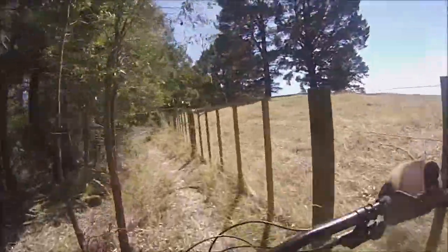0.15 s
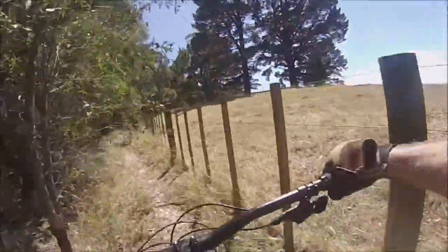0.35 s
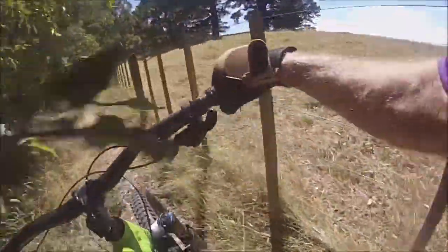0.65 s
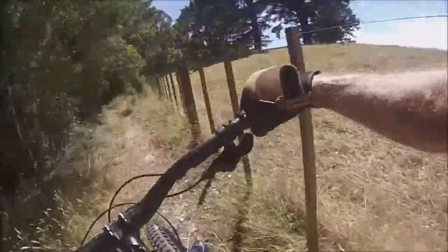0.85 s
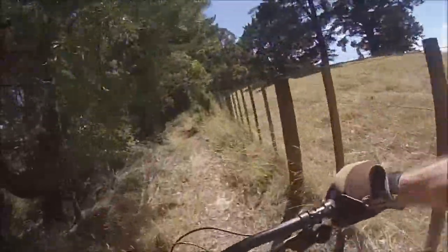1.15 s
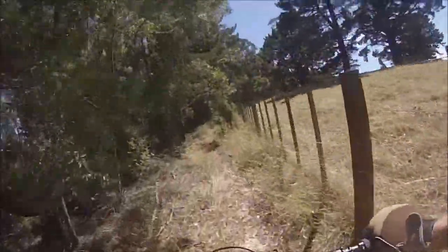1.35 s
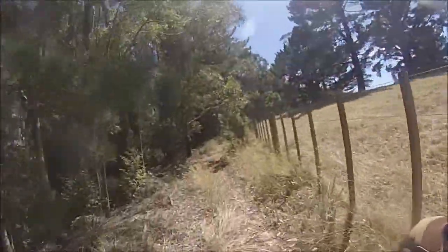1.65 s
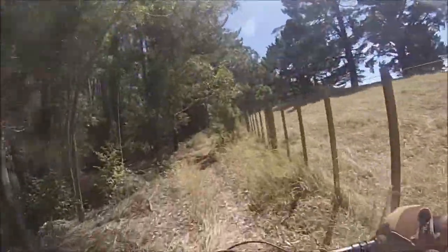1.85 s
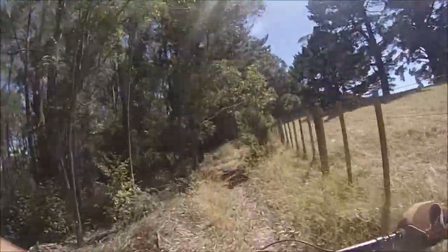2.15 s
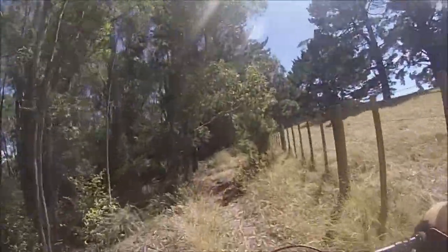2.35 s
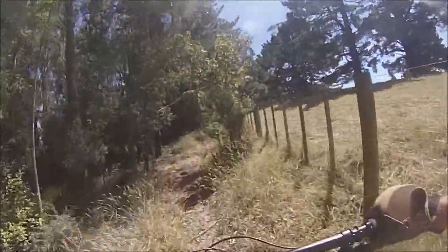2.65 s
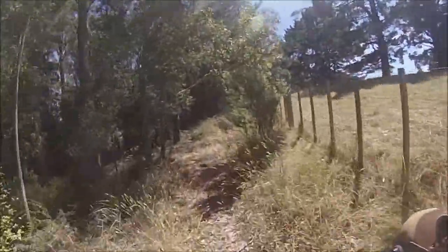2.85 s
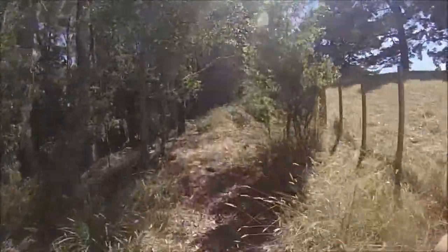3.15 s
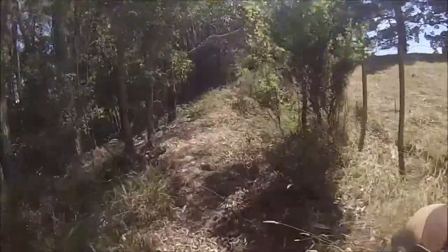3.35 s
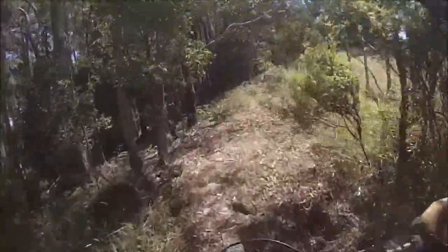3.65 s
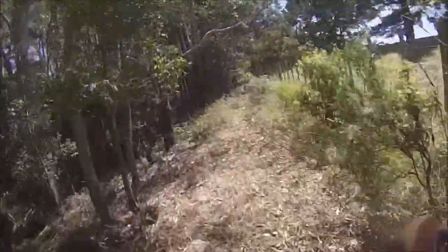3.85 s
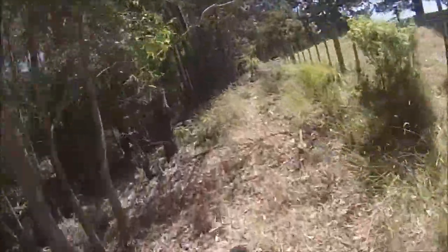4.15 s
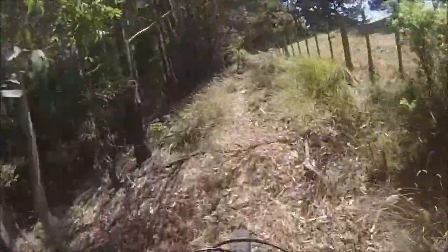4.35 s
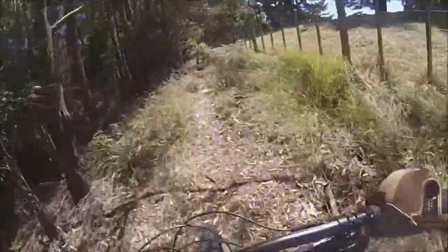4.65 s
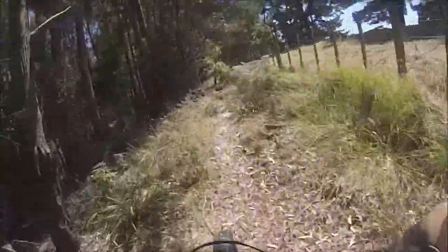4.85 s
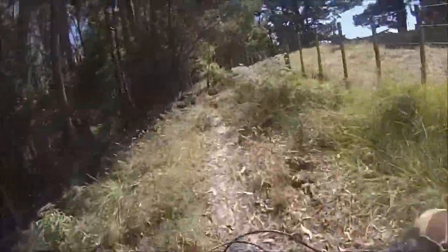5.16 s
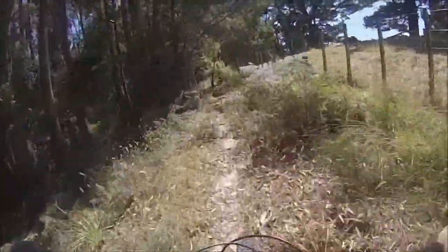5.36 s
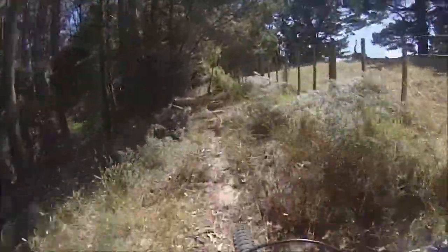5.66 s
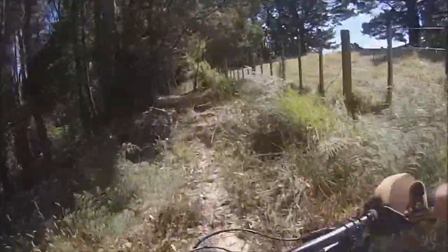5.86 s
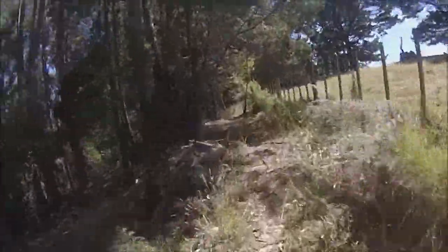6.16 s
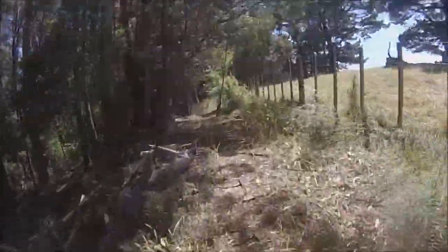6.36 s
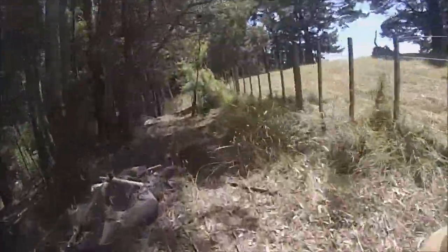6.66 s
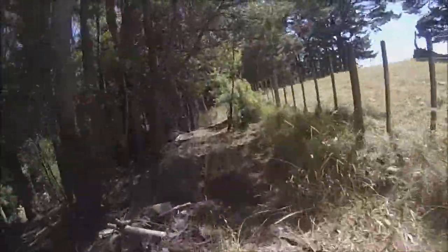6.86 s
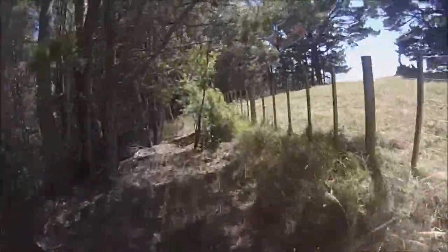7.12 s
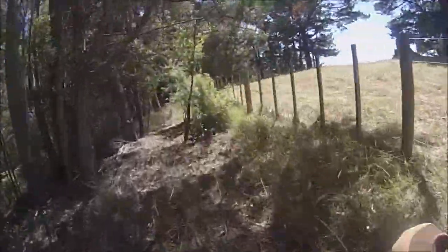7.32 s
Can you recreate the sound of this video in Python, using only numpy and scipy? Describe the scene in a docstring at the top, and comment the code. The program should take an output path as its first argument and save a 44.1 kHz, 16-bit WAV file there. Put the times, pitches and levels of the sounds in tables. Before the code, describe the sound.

A mountain bike rolls along a dirt trail, heard from a microphone on the rider's chest. From the start there is a low, lumpy rumble of wind and body sway, with tyres crunching more quietly over dirt, dry leaves and grass. A loose camera mount knocks dully and unevenly right at the microphone throughout, several times a second, with a slight buzz. At about 0.7 seconds something scrapes hard across the case, short and loud; the whole sound dips, then recovers over the next second. The chain slaps the frame now and then, clearest near 0.3, 1.8, 5.5 and 7 seconds, among faint ticks. Stronger knocks land around 3.3, 5.1 and 6 seconds. From about 5 seconds the crunch swells a little and twigs snap more often, the sharpest near 6.5 seconds. The ride continues until the end at about 7.5 seconds.

```python
"""A dirt trail through dry grass and leaf litter, heard from a camera on a mountain biker's chest.
From the start wind and sway rumble, the tyres crunch below, and the loose mount knocks dully against
its stops, right at the microphone. Before a second is out something scrapes hard across the case;
the gain control ducks and slowly recovers. The bike rolls on, the mount still knocking and the chain
slapping the frame, and from about five seconds twigs snap more often under the tyres."""
import sys
import numpy as np
from scipy import signal
from scipy.fft import rfft, irfft, next_fast_len
from scipy.io import wavfile
from scipy.ndimage import uniform_filter1d, minimum_filter1d, map_coordinates

SR = 44100
rng = np.random.default_rng(int(sys.argv[2]) if len(sys.argv) > 2 else 0)


def master(y):
    """Save y as 16-bit WAV."""
    cut = np.clip(np.atleast_2d(y).T, -1, 1)
    pcm = np.round(cut * 32767)  # scale
    wavfile.write(sys.argv[1], SR, pcm.astype(np.int16))


N = 330309

# Spectra, each a shape only: frequency_hz, density_db
RUMBLE_SPECTRUM = [(12, 1), (28, 4.5), (45, -3.5), (75, -16), (105, -12.5), (200, -20.5), (330, -28),
                   (600, -42.5), (1500, -74)]  # wind and body sway at the microphone
HEAVE_SPECTRUM = [(12, -0.5), (30, 0.5), (48, -10), (80, -25), (200, -43), (600, -77)]  # the deep rumble of a lurch
DIRT_SPECTRUM = [(120, -19.5), (300, 3), (520, -0.5), (750, -0.5), (1150, -3.5), (1650, -3.5), (2350, -4.5),
                 (2740, -2.5), (3000, -9), (3500, -6), (4400, -20.5), (7000, -41.5)]  # tyres on dirt
LEAF_SPECTRUM = [(1500, -19.5), (3000, -4.5), (3900, -1.5), (4800, -5), (5600, 1), (6300, 2), (7100, -1.5),
                 (8000, -5), (9200, -9.5), (10600, -3.5), (11800, -4), (13000, -12.5), (15000, -17.5)]  # dry leaves and grass being crushed
SCRAPE_SPECTRUM = [(60, -9.5), (110, 4), (220, -2.5), (480, -16.5), (790, 4.5), (1200, -9.5), (2100, -5.5),
                   (2800, -4.5), (3900, -10), (5000, -9), (6700, -18), (8600, -16), (9500, -24.5),
                   (10800, -17), (15000, -34)]  # what the scrape rings in the case
# the body of a click
CRACK_SPECTRUM = [(400, -5.5), (1200, 0.5), (1900, 3.0), (2900, 2), (4500, -11.5), (7000, -22.0),
                  (14000, -32)]
# the loose case buzzing
BUZZ_SPECTRUM = [(120, -8.5), (250, -1.5), (450, -15), (700, 2), (1300, -6.5), (2200, 8.5), (3100, 8.5),
                 (4500, 3.5), (8000, -10.5)]

# The rider lurches: centre_s, level_db
RIDER_LURCHES = [(.25, -37), (1.27, -32), (3.34, -40), (4.41, -31.5), (5.99, -31.5), (6.2, -36), (6.7, -34)]
# The ground under the tyres: time_s, roll_db, leaves_db
GROUND_LEVELS = [(0, -58, -64.5), (1.3, -58, -65), (1.8, -61, -65.5), (2.1, -59, -67), (2.3, -57, -67.5),
                 (2.5, -59.5, -66), (2.899, -59, -65.5), (3.45, -58.5, -61.5), (3.9, -58, -62),
                 (4.35, -58, -62), (4.7, -59.5, -61.5), (4.9, -60.5, -62.5), (5.23, -54, -58),
                 (5.46, -57, -62), (5.95, -58, -65), (6.389, -56.5, -62), (6.76, -57, -63),
                 (7.49, -59, -65.5)]
# Tall grass brushes the bike: centre_s, level_db
GRASS_TUFTS = [(.27, -61), (.62, -61.5), (3.54, -60.5), (4.95, -63.5), (6.22, -58), (7.35, -62.5)]
# Dry twigs snap under the tyres: start_s, level_db, pitch_hz, ring_over_crack_db
TWIG_SNAPS = [(.207, -45.5, 2170, -13), (3.5266, -43, 6770, -12), (4.9022, -43, 2830, -8),
              (5.2579, -37.5, 1400, -3), (5.2784, -45, 2560, -5), (5.3585, -42.5, 3320, -5.5),
              (5.3922, -37.5, 5450, -5), (6.4827, -31.5, 3400, -2.5), (6.7231, -38.5, 1840, 1.5)]
# The chain slaps the frame; the rows at 0.804 s and 1.098 s are light touches on the case after the scrape:
# start_s, level_db, pitch_hz, ring_over_crack_db
CHAIN_SLAPS = [(.2567, -37, 2820, -10), (.804, -47.5, 2005, 3), (1.098, -46, 2240, 0),
               (1.7554, -34.5, 2110, -8), (2.2818, -39.5, 2710, -15.5), (2.386, -39, 2070, -12),
               (3.2196, -44.5, 2720, -7), (4.3218, -41, 2160, -7), (4.389, -47, 2750, -4.5),
               (5.4656, -41.5, 2770, -7), (5.5263, -28.5, 2620, -11), (6.772, -42.5, 2200, -2),
               (6.9463, -40, 2160, -2), (6.9906, -37, 2170, -1.5), (7.0633, -43.5, 2540, -14)]
# Slips across the case, then a light touch: start_s, length_s, level_db, tilt_db_per_octave, pitch_hz
SCRAPE_SLIPS = [(0.699, .003, -32, -2.5, 1990), (.7022, .014, -16.5, -4.5, 2200),
                (0.713, .0082, -19, -2, 1750), (0.721, .0045, -4.5, -1, 2220),
                (0.7253, .003, -10.5, -1, 2700), (.729, .009, -16.5, -0.5, 2150),
                (0.7369, 0.0017, -3.5, 2.5, 1700), (.739, 0.003, -2.5, -4, 800),
                (0.741, .031, -20.5, 1, 1700), (0.7451, .002, -6, .5, 1750), (.765, .0014, 1.5, 5.5, 2720),
                (0.7683, 0.0027, 5.5, 4, 2800), (.772, .025, -21.5, 4, 2800),
                (.931, 0.0087, -37, -8.5, 1000)]
# Modes of the mount and case, the last row a broad lift near 4 kHz that brightens each knock: pitch_hz,
# width_hz, level_db
MOUNT_MODES = [(60, 260, -8), (154, 78.6, -9.5), (105, 11, -17), (370, 270, -31), (814, 395, -7.5),
               (1095, 110, -17.5), (3170, 250, -5.5), (4020, 460, -21.5)]
# The mount hits a stop: time_s, force_db
MOUNT_KNOCKS = [(0.0252, -17), (0.0935, -17.5), (.1261, -7.5), (.2321, 0.5), (.5057, 0.4), (0.618, -14),
                (.6639, -7.5), (1.032, 2), (1.0758, -13.5), (1.9207, 0.5), (2.124, -0.5), (2.6902, -6.5),
                (2.7365, -6.5), (2.8366, -19), (2.9059, -4), (2.9864, -8.5), (3.3037, 3), (3.456, -11),
                (3.8344, 0.9), (4.059, -3.5), (4.1862, -4.5), (4.2438, -13), (4.3618, -8.5), (5.0599, 1.5),
                (5.1296, -8.5), (5.5184, -8), (5.9556, 4.5), (6.0538, -12), (6.3646, 0.2), (6.514, -7),
                (6.5647, -9.5), (6.9417, -6.5), (7.0354, -4), (7.2948, -5.5), (7.376, -10)]


def amp(db):
    """Decibels to gain."""
    return 10 ** (np.asarray(db) / 20)


def unit(x):
    """Scale to rms 1."""
    return x / np.sqrt(np.mean(x ** 2) + 1e-20)


def along(points, hz):
    """Read (frequency_hz, value) points on a log axis."""
    frequencies, values = np.transpose(points)
    return np.interp(np.log(hz + 1), np.log(frequencies), values)


def wobble(rate):
    """A smooth random curve, rate knots a second."""
    return map_coordinates(rng.standard_normal(int(N * rate / SR) + 4), [np.arange(N) * rate / SR])


def filtered(x, response):
    """Pass x through a frequency response."""
    size = next_fast_len(2 * len(x))
    return irfft(rfft(x, size) * response(np.fft.rfftfreq(size, 1 / SR)), size)[:len(x)]


def coloured(x, spectrum):
    """Shape x by a spectrum, at rms 1."""
    return unit(filtered(x, lambda hz: amp(along(spectrum, hz))))


def resonance(f, centre, width):
    """Causal response of one mode."""
    return 1j * f * width / (centre ** 2 - f ** 2 + 1j * f * width)


def add(track, start_s, sound):
    """Mix a sound into the track from start_s on."""
    part = track[round(start_s * SR):][:len(sound)]
    part += sound[:len(part)]


def crackle(per_second, spread_db, share):
    """White noise in which a share of the power comes as tiny snaps of uneven size."""
    snaps = (rng.random(N) < per_second / SR) * rng.standard_normal(N)
    snaps *= amp(spread_db * np.minimum(rng.exponential(size=N), 4))
    return np.sqrt(share) * unit(snaps) + np.sqrt(1 - share) * rng.standard_normal(N)


def patchy(x, depth_db):
    """Give x random patches of gain, about 1 kHz wide and 40 ms long."""
    frames = signal.stft(x, nperseg=256)[2]
    patches = uniform_filter1d(rng.standard_normal(frames.shape), size=6, axis=0)
    patches = uniform_filter1d(patches, size=14, axis=1)
    return unit(signal.istft(frames * amp(depth_db * unit(patches)), nperseg=256)[1][:N])


def swells(events, half_width_s):
    """Power over time of bell-shaped swells, one for each (centre_s, level_db) row."""
    t = np.arange(N) / SR
    return sum(amp(db) ** 2 * np.exp(-((t - s) / half_width_s) ** 2) for s, db in events)


def sway(steady_db, jolt_db, jolt_decay_s):
    """Wind and body sway rumble in lumps, more just after each knock; a lurch adds a deep heave."""
    jolt_power, t = np.zeros(N), np.arange(SR // 2) / SR
    for s, db in MOUNT_KNOCKS:
        add(jolt_power, s, (amp(db + jolt_db) * np.exp(-t / jolt_decay_s)) ** 2)
    lumps_db = 3.2 * wobble(25)
    envelope = np.sqrt(amp(steady_db) ** 2 + jolt_power) * amp(lumps_db)
    rumble = envelope * coloured(rng.standard_normal(N), RUMBLE_SPECTRUM)
    lurches = np.sqrt(swells(RIDER_LURCHES, half_width_s=.044))
    return rumble + lurches * coloured(rng.standard_normal(N), HEAVE_SPECTRUM)


def tyres(roll_db, leaves_db, case_db):
    """Down at ground level the tyres roll over dirt and crush dry leaves and grass."""
    times, *levels = np.transpose(GROUND_LEVELS)
    roll, leaves = [np.interp(np.arange(N) / SR, times, db) for db in levels]
    bumps_db = .8 * wobble(23)  # bumps load and unload the tyres
    swish_db = 1.3 * wobble(22)  # short grass brushes past
    grit = coloured(crackle(per_second=330, spread_db=1.5, share=.37), DIRT_SPECTRUM)
    grit = patchy(grit, depth_db=2)
    grit = filtered(grit, lambda f: 1 + amp(case_db) * resonance(f, 2740, 110))  # the case sings along
    dirt = amp(roll + roll_db + bumps_db + .8 * wobble(77)) * grit
    crunch = coloured(crackle(per_second=1200, spread_db=3, share=.35), LEAF_SPECTRUM)
    crunch = patchy(crunch, depth_db=2.5)
    foliage = np.sqrt(amp(leaves + leaves_db) ** 2 + swells(GRASS_TUFTS, half_width_s=.05))
    return dirt + foliage * amp(bumps_db + swish_db + .7 * wobble(120)) * crunch


def stray_ticks(per_second, level_db, spread_db, pitch_hz, spread_octaves, ring_db):
    """Small stones and links tick at random moments: rows for clicks()."""
    draws = rng.random((round(per_second * N / SR), 3))
    return [(when * N / SR, level_db + spread_db * (size - .5),
             pitch_hz * 2 ** (spread_octaves * (pitch - .5)), ring_db) for when, size, pitch in draws]


def clicks(events, gain_db, treble_db, rise_s, crack_t60_s, ring_t60_s):
    """A short crack and a ring that outlasts it; the treble is dry wood splintering or links clashing."""
    out, t = np.zeros(N), np.arange(SR // 8) / SR
    attack = 1 - np.exp(-t / rise_s)
    for s, db, pitch_hz, ring_db in events:
        ring, body, treble = rng.standard_normal((3, len(t)))
        ring = unit(filtered(ring, lambda f: np.abs(resonance(f, pitch_hz, width=380)) ** 2))
        ring *= amp(ring_db - 60 * t / ring_t60_s)
        crack = unit(coloured(body, CRACK_SPECTRUM) + amp(treble_db) * coloured(treble, LEAF_SPECTRUM))
        crack *= amp(-60 * t / crack_t60_s)
        add(out, s, amp(db + gain_db) * attack * (crack + ring))
    return out


def scrape(rise_s, release_s, sag_db, grit_db, ring_db, ring_width_hz):
    """Stick and slip on the case: each slip breaks loose sharply and sags, a gritty burst with one ring."""
    out, t = np.zeros(N), np.arange(SR // 16) / SR
    for s, length_s, db, tilt, pitch_hz in SCRAPE_SLIPS:
        grit = rng.standard_normal(len(t))
        grit *= amp(grit_db * unit(uniform_filter1d(rng.standard_normal(len(t)), size=36)))
        sag = amp(-sag_db * np.minimum(t / length_s, 1))
        release = np.exp(-np.maximum(t - length_s, 0) / release_s)
        push = (1 - np.exp(-t / rise_s)) * sag * release
        rub = filtered(grit, lambda f: amp(along(SCRAPE_SPECTRUM, f) + tilt * np.log2(np.maximum(f, 500))))
        ring = filtered(grit, lambda f: np.abs(resonance(f, pitch_hz, ring_width_hz)) ** 2)
        ring_gain = amp(ring_db + .21 * db)  # a harder slip rings the case more
        burst = unit(push * rub) + ring_gain * unit(push * ring)
        add(out, s, amp(db) * burst * np.sqrt(length_s * SR / np.sum(burst ** 2)))
    return out


def mount(gain_db, buzz_db, buzz_t60_s, rebound_s, rebound_db, nudges_per_s, nudge_db):
    """The mount hits its stop and drops back softly; each push rings it and buzzes the loose case."""
    force, buzz = np.zeros(N), np.zeros(N)
    t = np.arange(SR // 8) / SR
    lead_s = .02  # room for the push to rise to its peak
    contact_ms, softest_ms = .25, 1.5  # half-widths of a 0 dB contact and of the gentlest
    hardening = .78  # the harder the hit, the shorter the contact
    rebounds = [(s + rebound_s * (.5 + rng.random()), db + rebound_db) for s, db in MOUNT_KNOCKS]
    nudges = [(s, nudge_db) for s in rng.uniform(lead_s, N / SR, round(nudges_per_s * N / SR))]
    for s, db in MOUNT_KNOCKS + rebounds + nudges:
        half_width_ms = min(contact_ms / amp(db) ** hardening, softest_ms)
        push = -amp(db) / (1 + ((t - lead_s) * 1000 / half_width_ms) ** 2)
        chatter = coloured(rng.standard_normal(len(t)), BUZZ_SPECTRUM) * amp(-60 * t / buzz_t60_s)
        add(force, s - lead_s, push)
        add(buzz, s - lead_s, signal.fftconvolve(push, chatter / np.linalg.norm(chatter)))
    knock = filtered(force, lambda f: sum(amp(db) * resonance(f, hz, width)
                                          for hz, width, db in MOUNT_MODES))
    return amp(gain_db) * knock + amp(buzz_db) * buzz


def scene():
    """Everything that reaches the chest microphone, from its own mount down to the trail."""
    knocks = mount(gain_db=-.45, buzz_db=-24.5, buzz_t60_s=.049, rebound_s=.018, rebound_db=-21.5,
                   nudges_per_s=2, nudge_db=-22)
    rub = scrape(rise_s=.00032, release_s=.00076, sag_db=6, grit_db=3.5, ring_db=-3, ring_width_hz=160)
    rumble = sway(steady_db=-43, jolt_db=-41, jolt_decay_s=.1)
    trail = tyres(roll_db=.5, leaves_db=1.4, case_db=-2)
    chain = clicks(CHAIN_SLAPS, gain_db=3, treble_db=-17.5, rise_s=.00063,
                   crack_t60_s=.021, ring_t60_s=.045)
    twigs = clicks(TWIG_SNAPS, gain_db=2, treble_db=3, rise_s=.00047, crack_t60_s=.024, ring_t60_s=.042)
    strays = stray_ticks(per_second=3.6, level_db=-47.5, spread_db=4.5, pitch_hz=2550,
                         spread_octaves=.8, ring_db=-4.5)
    ticks = clicks(strays, gain_db=1.5, treble_db=-6.5, rise_s=.001, crack_t60_s=.015, ring_t60_s=.057)
    return (rumble + trail + ticks + twigs + chain + rub + knocks)[None]


def gain_control(x, limit_db, hold_s, recover_db_per_s):
    """The gain drops at once under a loud sound, holds, then climbs back steadily."""
    level_db = 10 * np.log10(np.abs(uniform_filter1d(x ** 2, size=110)) + 1e-12)
    half_hold = int(hold_s * SR) // 2
    cut_db = -minimum_filter1d(np.minimum(limit_db - level_db, 0), 2 * half_hold + 1, origin=half_hold)
    climb_db = recover_db_per_s * np.arange(N) / SR
    return x * amp(climb_db - np.maximum.accumulate(cut_db + climb_db))


def record(dry):
    """The camera's mono microphone channel: gain control, soft overload and a steep band limit."""
    ducked = gain_control(dry[0], limit_db=-8.5, hold_s=.4, recover_db_per_s=29.5)
    clipped = ducked / (1 + ducked ** 6) ** (1 / 6)
    top_hz = 15350
    return filtered(clipped, lambda hz: 1 / (1 + (hz / top_hz) ** 120))[None]


dry = scene()
out = record(dry)
master(out)
```